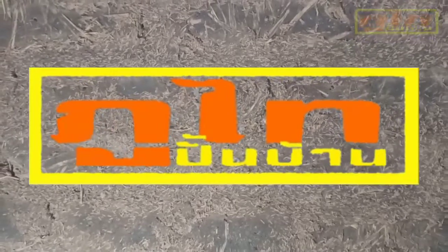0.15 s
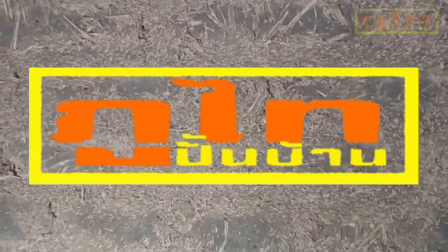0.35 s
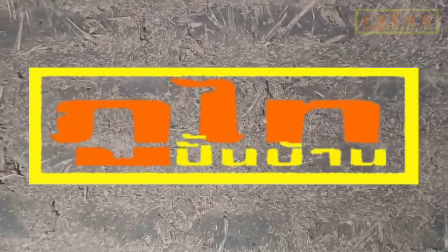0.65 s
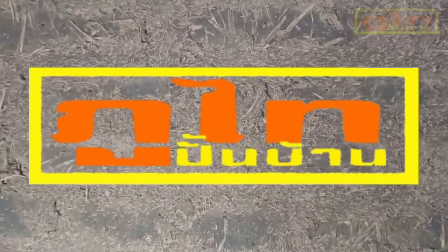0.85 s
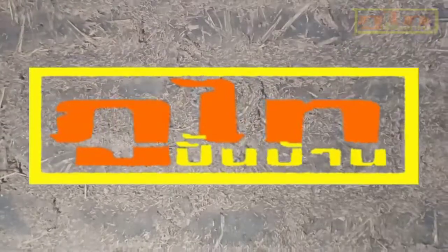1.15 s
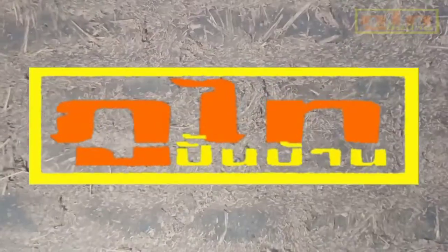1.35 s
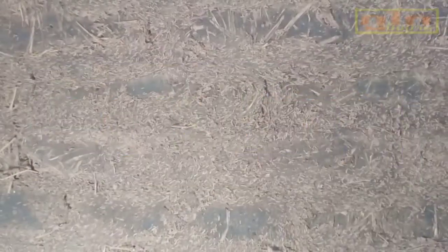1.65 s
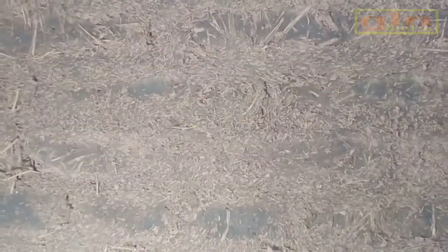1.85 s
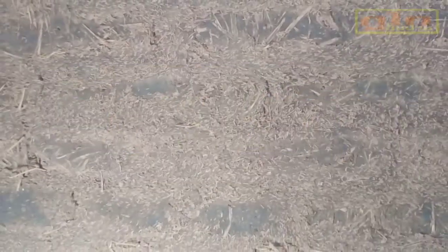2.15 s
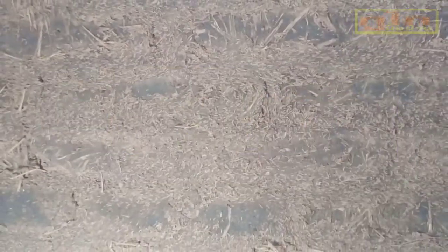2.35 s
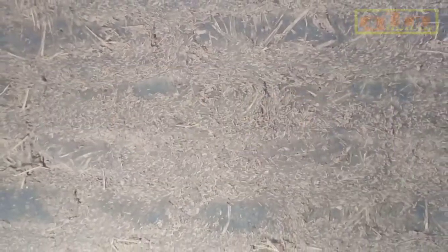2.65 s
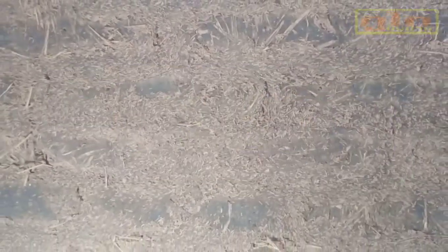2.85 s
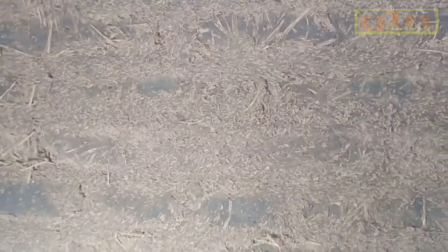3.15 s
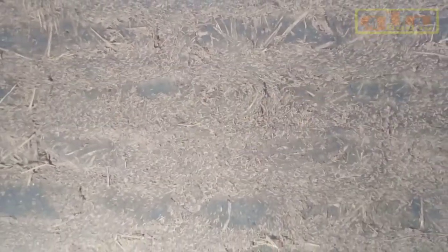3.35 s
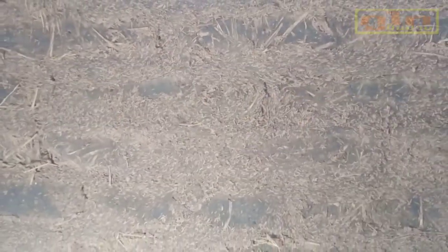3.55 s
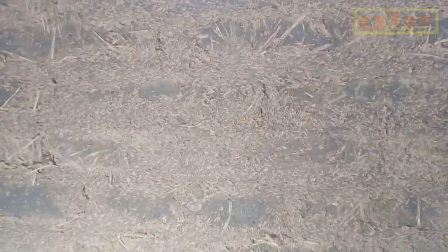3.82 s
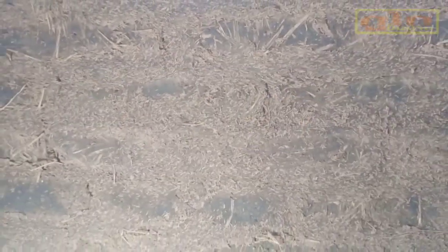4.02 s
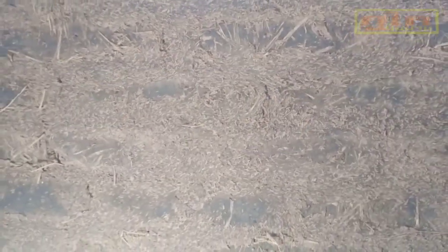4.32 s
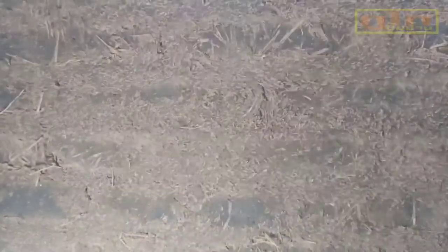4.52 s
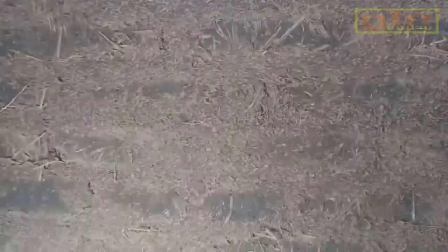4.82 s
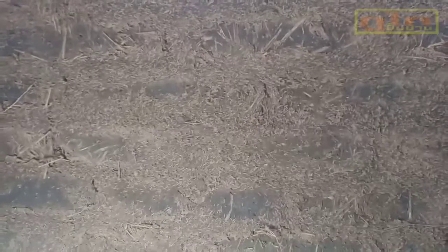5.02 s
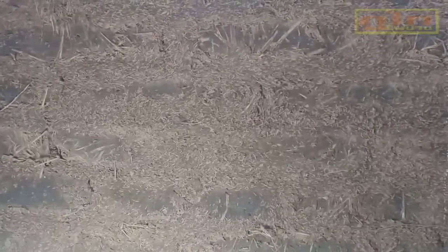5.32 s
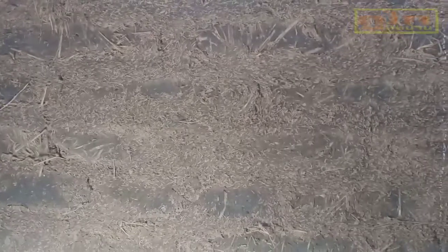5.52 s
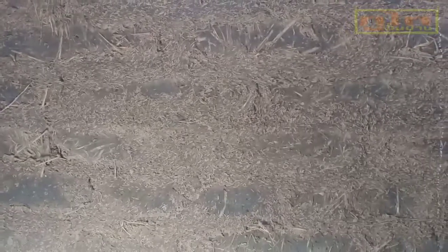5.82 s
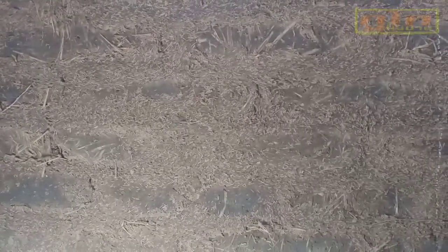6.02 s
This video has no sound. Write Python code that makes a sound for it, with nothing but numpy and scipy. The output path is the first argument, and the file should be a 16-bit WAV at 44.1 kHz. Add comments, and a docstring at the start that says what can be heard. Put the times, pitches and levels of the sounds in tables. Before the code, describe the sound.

Night in an open field. From 0.1 s a frog very near the microphone gives short, sharp, buzzy notes, each about a twentieth of a second, nearly four per second. The first are hoarse; soft slower trills creak just before the notes at 0.4 and 0.65 s, and one stands alone near 0.9 s. The notes get clearer and gradually weaker, the tenth and last at 2.65 s. Background hiss swells with each note and drops shortly after. From 3.1 s a second, higher-ringing frog, much fainter, repeats single buzzes every quarter second to about 5.5 s. Behind are a distant frog chorus fading after 4.6 s, a third faint frog beating evenly from 3.6 s, and dry slow rattles about every 0.7 s from 2.2 s. A very high cricket pulses softly until 1.6 s and again from 3.2 s. Thin falling insect chirps come at 1.9, 3.3 and 4.6 s, over barely audible hums, low air rumble and steady insect hiss.

```python
"""A rice field at night. A near frog gives a fast series of short buzzy notes and stops; a second, further off, takes over.
Behind them are a third frog, a distant chorus, a slow rattling frog, a pulsing cricket, insect chirps, faint hums and hiss.
Frogs are trains of snaps ringing a vocal sac, the cricket and the hiss are shaped noise, chirps and hums are wavering tones.
A noise gate lifts the background while the near frog calls and drops it shortly after each note."""
import sys
import numpy as np
from scipy import signal
from scipy.fft import rfft, irfft, next_fast_len
from scipy.io import wavfile
from scipy.ndimage import uniform_filter1d

SR = 44100
rng = np.random.default_rng(int(sys.argv[2]) if len(sys.argv) > 2 else 0)


def inscribe(sig):
    """Save sig as 16-bit PCM at rate SR to the path in sys.argv[1].

    A 1-D sig is mono; a 2-D sig holds one channel per row.
    Samples are clipped to [-1, 1] before scaling.
    """
    pcm = np.round(np.clip(np.atleast_2d(sig).T, -1, 1) * 32767)
    wavfile.write(sys.argv[1], SR, pcm.astype(np.int16))


N = 272097
TIME = np.arange(N) / SR


def undb(db):
    """Turn decibels into a gain."""
    return 10 ** (np.asarray(db) / 20)


def unit(x):
    """Scale a sound to rms 1."""
    return x / np.sqrt(np.mean(x ** 2) + 1e-20)


def add(out, start, x):
    """Mix x into out from a start time in seconds."""
    first = max(int(start * SR), 0)
    out[first:first + len(x)] += x[:max(N - first, 0)]


def gains(points, size):
    """Read a spectrum's gain at each frequency bin, joining its points on a log frequency scale."""
    hz, db = np.transpose(points)
    bins_hz = np.arange(size // 2 + 1) * SR / size
    return undb(np.interp(np.log(bins_hz + 1), np.log(hz), db))


def ring(points, size=1024):
    """How a body with this spectrum rings after one tap: nothing before the tap (minimum phase)."""
    cepstrum = irfft(np.log(gains(points, size)))
    # fold the backward half of time onto the forward half
    cepstrum[1:size // 2] *= 2
    cepstrum[size // 2 + 1:] = 0
    return irfft(np.exp(rfft(cepstrum)))[:size // 2]


def noise(points):
    """Noise with this spectrum, scaled to rms 1."""
    size = 2 * next_fast_len(N // 2 + 1)
    white = rfft(rng.standard_normal(size))
    return unit(irfft(white * gains(points, size))[:N])


def walk(rate, n=N):
    """Random drift with spread near 1: straight lines between `rate` random points a second."""
    at = np.arange(n) / SR * rate
    count = int(at[-1]) + 2
    return 1.202 * np.interp(at, np.arange(count), rng.standard_normal(count))


def pulses(hz, force, jitter, scatter_db, reach=8):
    """One sharp snap per cycle, each a little off in time (share of a cycle) and size (dB)."""
    phase = np.concatenate([[0], np.cumsum(hz[1:]) / SR])
    chance = rng.standard_normal((int(phase[-1]) + 1, 2))
    cycles = np.arange(len(chance)) + jitter * chance[:, 0]
    at = np.interp(cycles, phase, np.arange(len(hz)))
    size = force[at.astype(int)] * undb(scatter_db * chance[:, 1])
    # a windowed sinc places each snap between the samples
    taps = at.astype(int)[:, None] + np.arange(2 * reach)
    offset = taps - at[:, None] - reach
    out = np.zeros(len(hz) + 2 * reach)
    np.add.at(out, taps, size[:, None] * np.sinc(offset) * np.sinc(offset / reach))
    return out


def voice(snaps, sac, db):
    """Snaps ring the vocal sac; db is the rms over the note."""
    y = signal.fftconvolve(snaps, sac)
    return y * undb(db) * np.sqrt(len(snaps) / np.sum(y ** 2))


def note(length, db, sac, open_hz, mid_hz, close_hz, mid_db, jitter, scatter_db, rasp, attack_db, sag):
    """A frog's note: the snap rate moves from open through mid to close; harmonics swell near the sac's resonance."""
    u = np.linspace(0, 1, int(length * SR))
    # a positive sag makes the rate dip early on, a negative one makes it bulge
    rates = [open_hz, mid_hz * (1 - sag), mid_hz, mid_hz, close_hz, close_hz]
    hz = np.interp(u, [0, .2, .46, .62, .84, 1], rates)
    # attack_db sets the first snaps; then a slight dip, a steady middle and a late fade
    push_db = [mid_db + attack_db, mid_db - 1.0, mid_db, mid_db, 0, -1, -4]
    force = undb(np.interp(u, [.06, .13, .22, .55, .72, .92, 1], push_db))
    snaps = pulses(hz, force, jitter, scatter_db)
    # air hisses through the larynx with the snaps
    snaps[:len(u)] += rasp * force * rng.standard_normal(len(u))
    return voice(snaps, sac, db)


def swell_late(x, hz, width_hz):
    """All-pass: near its resonance the sac takes a moment to get going, with no change in strength."""
    b, a = signal.iirpeak(hz, hz / width_hz, fs=SR)
    return x - 2 * signal.lfilter(b, a, x)


def field(x, t60, wet_db):
    """Stubble and earth banks scatter a diffuse tail that dies by 60 dB in t60 seconds."""
    t = TIME[:SR // 2]
    decay = np.exp(-np.log(1000) * t / t60)
    tail = rng.standard_normal(len(t)) * decay * (1 - np.exp(-t / 0.0025))
    tail /= np.sqrt(np.sum(tail ** 2))
    return x + undb(wet_db) * signal.fftconvolve(x, tail)[:N]


# tone colour of the air with microphone noise, and of the far insects: (f/Hz, relative level per Hz/dB)
AIR_COLOUR = [(25, -23), (45, -9), (70, 0.5), (140, .5), (220, -9.5), (450, -14.5), (1000, -18),
              (2400, -16.5), (3200, -10), (4300, -22.5), (9000, -25.5), (15500, -29)]
INSECT_COLOUR = [(5500, -24.5), (6500, -18), (6950, -24.5), (7350, -7.5), (7680, -1.5), (7950, -7),
                 (8450, -18), (9200, -15.5), (10100, -16), (10900, -7.5), (11300, -12), (12000, -22.5)]


def night(air_db=-56.0, insects_db=-64.5):
    """Low rumble of the air and the steady hiss of far insects: two coloured noises, barely wavering."""
    air = noise(AIR_COLOUR) * undb(air_db + 0.48 * walk(9))
    insects = noise(INSECT_COLOUR) * undb(insects_db + 0.62 * walk(25))
    return air + insects


# faint far-off hums: (t/s, length/s, highest f/Hz, drop of the pitch at both ends as a share, level/dB)
FAR_HUMS = [(0.903, 0.2667, 754.6, 0.12, -71.5), (3.05, 1.8, 296.6, 0.0014, -72.5)]


def hums(waver=0.01303):
    """Faint tones that come and go far away, unsteady in pitch and strength."""
    out = np.zeros(N)
    for start, length, top_hz, arch, db in FAR_HUMS:
        u = np.linspace(-1, 1, int(length * SR))
        hz = top_hz * (1 - arch * u ** 2 + waver * walk(60.4, len(u)))
        tone = np.sin(2 * np.pi * np.cumsum(hz) / SR)
        swell = signal.windows.tukey(len(u), .4) * undb(3.5 * walk(13, len(u)))
        add(out, start, undb(db) * unit(tone * swell))
    return out


# single notes that stand out of the chorus: (t/s, level/dB)
STANDOUT_NOTES = [(2.74, -56.5), (2.865, -56), (3.55, -59), (5.71, -60), (5.961, -62)]
# vocal sac and throat of a distant frog, also used by the third frog: (f/Hz, relative level/dB)
DISTANT_SAC = [(900, -49), (1400, -15), (2200, -27), (2600, -8.5), (2930, -2), (3200, -9), (3550, -9),
               (4100, -26.5), (7000, -46.5)]


def chorus(count=70, crowd_db=-60.5, spread_db=0.5, fade_db=-9):
    """Many distant frogs, each note a short buzz at its own pulse rate; the crowd grows fainter at the end."""
    out, sac = np.zeros(N), ring(DISTANT_SAC)
    # one note at a random moment in each equal slice of time
    starts = (np.arange(count) + rng.random(count)) * TIME[-1] / count
    crowd = [(s, crowd_db + spread_db * rng.standard_normal() + np.interp(s, [4.6, 5.6], [0, fade_db]))
             for s in starts]
    for start, db in STANDOUT_NOTES + crowd:
        hz = 430 * np.exp(0.01553 * rng.standard_normal())
        add(out, start, note(0.05073, db, sac, hz, hz, .96 * hz, mid_db=2.5, jitter=0.0254,
                             scatter_db=1.5, rasp=0.024, attack_db=4.5, sag=0.01824))
    return field(out, t60=.25, wet_db=-11.5)


# how the third frog's strength changes, from its first beat to the end: (t/s, level/dB)
THIRD_FADE = [(3.627, -55.5), (4.65, -56), (5.4, -60.5)]


def third_frog(period_s=.241, held_hz=423):
    """A distant frog built from the same snaps, keeping an even beat in the chorus as it fades away."""
    out, sac = np.zeros(N), ring(DISTANT_SAC)
    times, levels = np.transpose(THIRD_FADE)
    edge_hz = .955 * held_hz
    for start in np.arange(times[0], times[-1], period_s):
        db = np.interp(start, times, levels)
        add(out, start, note(.048, db, sac, edge_hz, held_hz, edge_hz, mid_db=1.5, jitter=.007,
                             scatter_db=1.73, rasp=.009, attack_db=1.46, sag=0.0255))
    return field(out, t60=.21, wet_db=-8.0)


# starts of the rattles, all alike: (t/s)
RATTLE_STARTS = [1.074, 2.164, 2.83, 3.458, 4.117, 4.765, 5.487]
# vocal sac and throat of the rattling frog: (f/Hz, relative level/dB)
RATTLER_SAC = [(800, -43), (1330, 4.5), (1700, -4), (2050, 0.5), (2600, -1.5), (4000, -31), (8000, -50)]


def rattler(rate_hz=35.0, length_s=0.2385, level_db=-66):
    """Another kind of frog: slow, uneven dry clicks that swell and fade, ringing a lower sac."""
    out, sac = np.zeros(N), ring(RATTLER_SAC)
    u = np.linspace(0, 1, int(length_s * SR))
    swell = 0.68 + np.sin(np.pi * u)
    for start in RATTLE_STARTS:
        clicks = pulses(np.full(len(u), rate_hz), swell, jitter=0.01127, scatter_db=3.5)
        add(out, start, voice(clicks, sac, level_db))
    return field(out, t60=0.136, wet_db=-4)


# the cricket's even runs: (middle of first pulse t/s, end t/s, period/s, pulse length/s, f/Hz,
# level of the noise before the pulses shape it/dB)
CRICKET_RUNS = [(.04, 1.63, .1275, .12, 9410, -65.5), (3.24, 4.7, .1272, .1, 9230, -72),
                (4.75, 6.2, .1155, .09, 9420, -70)]


def cricket(width_hz=230, skirt_hz=950):
    """Soft pulses of narrow-band noise on an even beat; after a pause they return weaker and then quicken."""
    out = np.zeros(N)
    for first, end, period, length, hz, db in CRICKET_RUNS:
        pulse = np.sin(np.linspace(0, np.pi, int(length * SR)))
        swell = np.zeros(N)
        for middle in np.arange(first, end, period):
            add(swell, middle - length / 2, pulse)
        band = [(hz - skirt_hz, -36), (hz - width_hz, -6), (hz, 0), (hz + width_hz, -6), (hz + skirt_hz, -40)]
        out += undb(db) * swell * noise(band)
    return out


# insect chirps: (t/s, length/s, first f/Hz, last f/Hz, level before the echo is mixed in/dB)
INSECT_CHIRPS = [(1.855, 0.129, 7076, 6880, -57.5), (3.289, 0.135, 6920, 6680, -55),
                 (4.607, .12, 6682, 6350, -55.5)]


def chirps(waver=0.01827):
    """Thin insect chirps: falling, wavering tones smeared by distance."""
    out = np.zeros(N)
    for start, length, first_hz, last_hz, db in INSECT_CHIRPS:
        u = np.linspace(0, 1, int(length * SR))
        hz = (first_hz + (last_hz - first_hz) * u) * (1 + waver * walk(703.8, len(u)))
        tone = np.sin(2 * np.pi * np.cumsum(hz) / SR)
        add(out, start, undb(db) * unit(np.sin(np.pi * u) * tone))
    # direct sound and echo are about equally strong, so share the level between them
    return field(out, t60=0.59, wet_db=0.5) / np.sqrt(2)


# second frog's notes: (t/s, length/s, level/dB)
SECOND_FROG_NOTES = [(3.137, 0.0364, -50), (3.414, 0.0515, -48), (3.692, 0.053, -50),
                     (3.961, 0.0569, -48.5), (4.232, 0.0555, -50), (4.489, 0.056, -50.5),
                     (4.746, 0.0466, -51), (4.996, 0.0546, -51.5), (5.257, 0.0456, -51.5),
                     (5.51, 0.049, -50.5)]
# its vocal sac and throat: (f/Hz, relative level/dB)
SECOND_FROG_SAC = [(900, -41), (1500, -20), (2300, -22), (3100, -11.5), (3460, -1), (3850, -16),
                   (4200, -22.5), (4700, -23), (6000, -45.5), (12000, -41.5)]


def far_frog(first_hz=400.9, tiring_hz_per_s=-6):
    """A smaller frog with a higher-ringing sac and a field echo; its pulse rate sinks as it tires."""
    out = np.zeros(N)
    sac = swell_late(ring(SECOND_FROG_SAC), hz=3346, width_hz=1380)
    for start, length, db in SECOND_FROG_NOTES:
        hz = first_hz + tiring_hz_per_s * (start - SECOND_FROG_NOTES[0][0])
        add(out, start, note(length, db, sac, 0.976 * hz, hz, .935 * hz, mid_db=1, jitter=0.0139,
                             scatter_db=0.94, rasp=0.018, attack_db=1.5, sag=0.0457))
    return field(out, t60=0.148, wet_db=-8.5)


# near frog's notes, and its slow soft trills leading into a note or alone:
# (t/s, length/s, level/dB, held pulse rate f/Hz)
NEAR_FROG_NOTES = [(0.1328, 0.04844, -31.5, 423), (.4, 0.04547, -32.5, 422.3), (0.6569, 0.044, -32, 424.2),
                   (1.032, .045, -33.5, 428.6), (1.2868, 0.04626, -35, 433.3),
                   (1.5858, 0.0437, -33.5, 426.2), (1.8511, .044, -33.5, 423.9),
                   (2.1161, 0.0417, -34.5, 434.1), (2.376, 0.0459, -35.5, 448.9),
                   (2.6494, 0.0435, -36.5, 454.9)]
NEAR_FROG_TRILLS = [(0.3814, 0.02, -42, 345), (0.6315, 0.02285, -40, 361.9), (0.8743, .058, -42, 365.3)]
# its vocal sac and throat, taut for notes and slack for trills: (f/Hz, relative level/dB)
TAUT_SAC = [(850, -54), (1130, -38), (1240, -24), (1370, -14), (1690, -20), (2050, -25), (2500, -13),
            (2720, -5.5), (2890, 1), (2990, -3), (3150, -10.5), (3400, -15), (3800, -22), (4250, -27),
            (5050, -37.5), (5450, -33.5), (6700, -40.5), (8500, -58.5), (10400, -36.5), (13000, -62)]
LOOSE_SAC = [(850, -39.5), (1250, -23.5), (1750, -11), (2200, -19), (2600, -10), (2950, 1.5), (3300, -4),
             (3800, -8.5), (4400, -19.5), (5100, -24.5), (5600, -23.5), (8500, -36.5), (10400, -43),
             (13000, -52)]
# its voice is hoarsest in the first notes: (t/s, roughness 0-1)
ROUGHNESS = [(.4, 0.53), (.75, 0.26), (1.3, 0.25), (2.65, 0.3)]
# change of the taut sac in a fully hoarse note: (f/Hz, change of level/dB)
HOARSE_COLOUR = [(1300, -2.5), (2000, 2), (2950, 0.5), (3800, 8.5), (7000, 0.5)]
# all notes open and close on the same pulse rates; the higher one is held, the weaker its middle
NEAR_OPEN_HZ, NEAR_CLOSE_HZ, STRAIN_DB_PER_HZ = 480.74, 412.76, -0.0588
TRILL_OPEN_HZ, TRILL_CLOSE_HZ = 432.1, 328.2
# kick of the first snaps in a clear and in a fully hoarse note
CLEAR_KICK_DB, HOARSE_KICK_DB = -0.64, 5


def near_frog():
    """Buzzy notes from close by: roughness makes the snaps uneven and breathy; trills ring a slack sac."""
    clear, hoarse = np.zeros(N), np.zeros(N)
    for start, length, db, hz in NEAR_FROG_NOTES:
        rough = np.clip(np.interp(start, *np.transpose(ROUGHNESS)), 0, 1)
        colour = [(f, gain + rough * np.interp(f, *np.transpose(HOARSE_COLOUR))) for f, gain in TAUT_SAC]
        taut = swell_late(ring(colour), hz=2884.0, width_hz=1470)
        strain_db = STRAIN_DB_PER_HZ * (hz - NEAR_CLOSE_HZ)
        kick_db = CLEAR_KICK_DB + (HOARSE_KICK_DB - CLEAR_KICK_DB) * rough
        y = note(length, db, taut, NEAR_OPEN_HZ, hz, NEAR_CLOSE_HZ, mid_db=strain_db, jitter=0.0209 * rough,
                 scatter_db=2.37 * rough, rasp=0.0497 * rough, attack_db=kick_db, sag=0.0162)
        add(clear, start, (1 - rough) * y)
        add(hoarse, start, rough * y)
    slack = swell_late(ring(LOOSE_SAC), hz=3200, width_hz=1380)
    for start, length, db, hz in NEAR_FROG_TRILLS:
        add(clear, start, note(length, db, slack, TRILL_OPEN_HZ, hz, TRILL_CLOSE_HZ, mid_db=-1.5, jitter=0.0065,
                               scatter_db=2.02, rasp=0.019, attack_db=0.44, sag=-0.0596))
    # the hoarse share gets a short blur of its own; then everything gets the longer field echo
    return field(clear + field(hoarse, t60=0.041, wet_db=-7), t60=0.232, wet_db=-13.0)


def scene():
    """Everything in the field together, from the background to the near frog."""
    background = night() + hums() + chorus() + third_frog() + rattler() + cricket() + chirps()
    return (background + far_frog() + near_frog())[None]


def gate(x, threshold_db, closed_db, hold_s, window):
    """Opens when the sound passes the threshold, holds, then turns everything down again."""
    loud = uniform_filter1d(x ** 2, window) > undb(threshold_db) ** 2
    last_loud = np.maximum.accumulate(np.where(loud, TIME, -1))
    held = (TIME - last_loud < hold_s) * 1.
    # smooth the switching so that it does not click
    is_open = uniform_filter1d(held, 2 * window)
    return x * undb(closed_db * (1 - is_open))


def record(dry):
    """Noise gate (window in samples), then a steep treble limit at 15550 Hz."""
    gated = gate(dry[0], threshold_db=-40.5, closed_db=-8.0, hold_s=0.0878, window=200)
    treble_limit = signal.ellip(10, .1, 70, 15550, fs=SR, output="sos")
    return signal.sosfilt(treble_limit, gated)[None]


dry = scene()
out = record(dry)
inscribe(out)
```